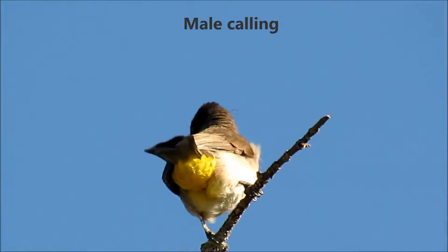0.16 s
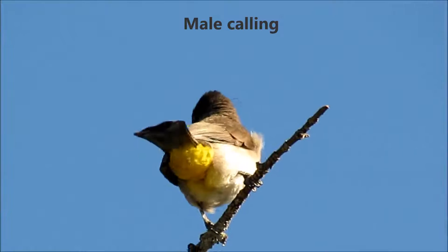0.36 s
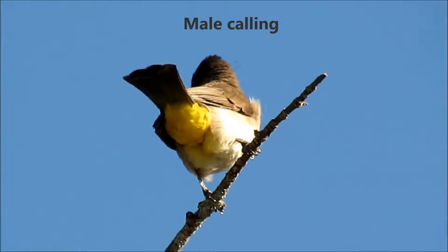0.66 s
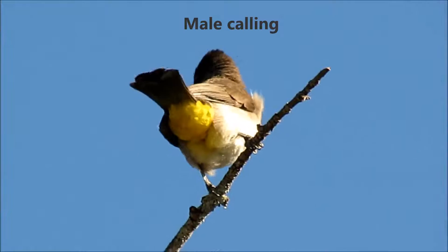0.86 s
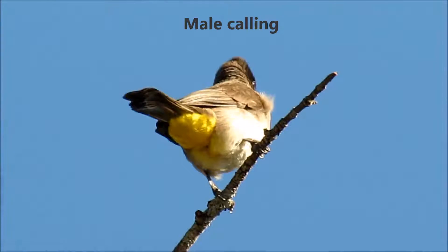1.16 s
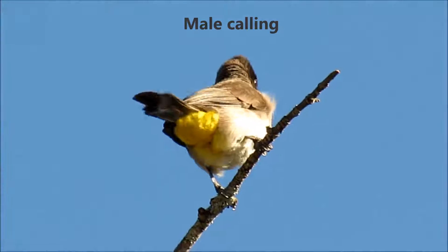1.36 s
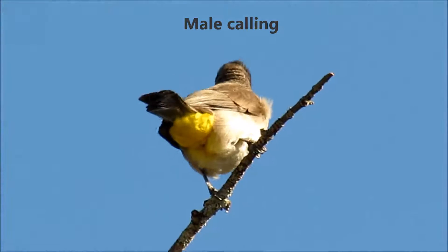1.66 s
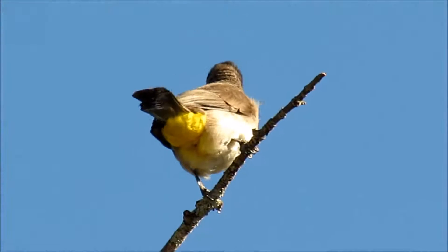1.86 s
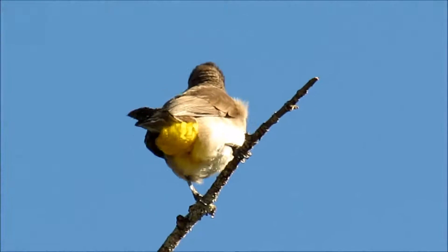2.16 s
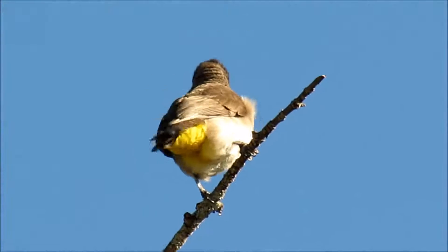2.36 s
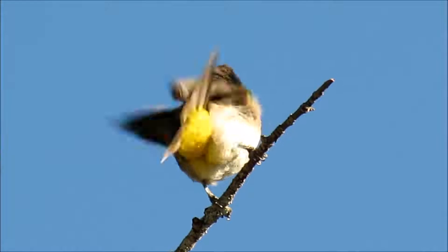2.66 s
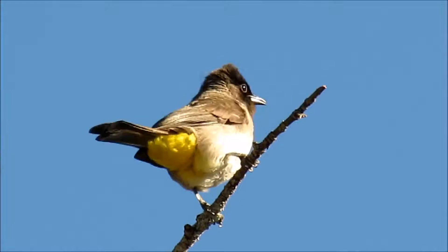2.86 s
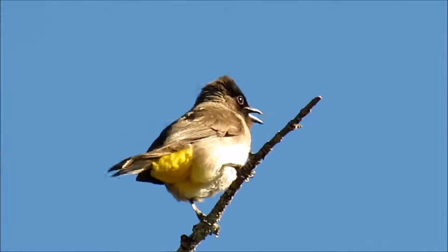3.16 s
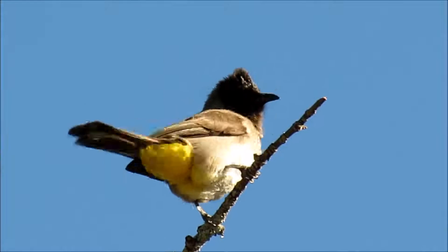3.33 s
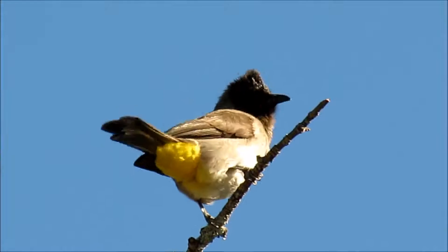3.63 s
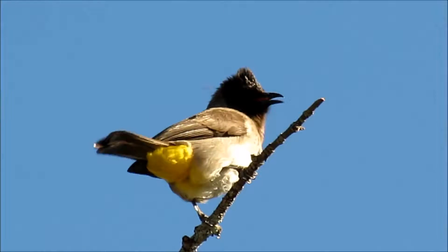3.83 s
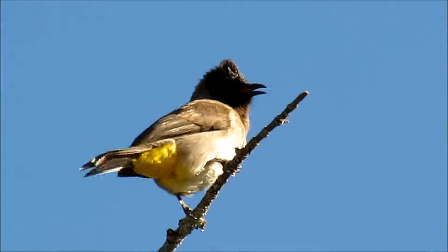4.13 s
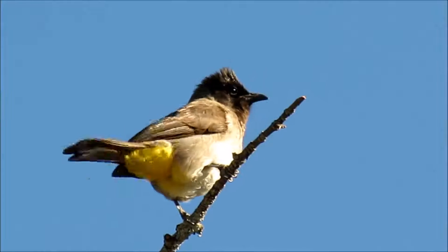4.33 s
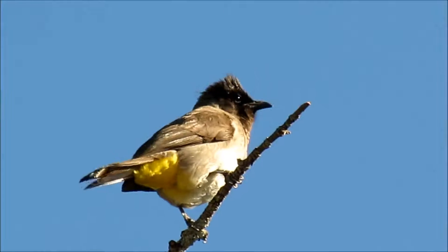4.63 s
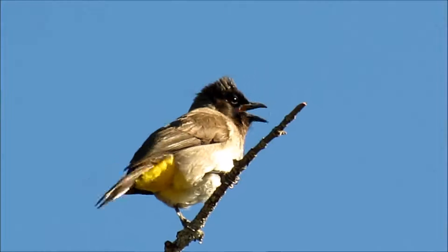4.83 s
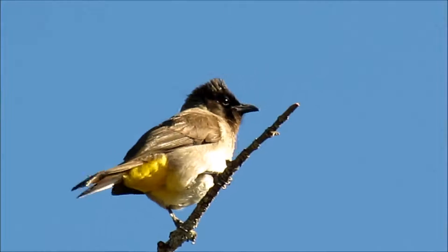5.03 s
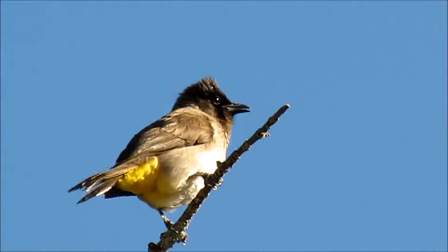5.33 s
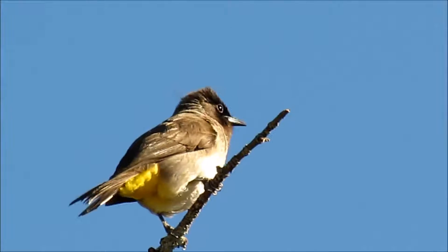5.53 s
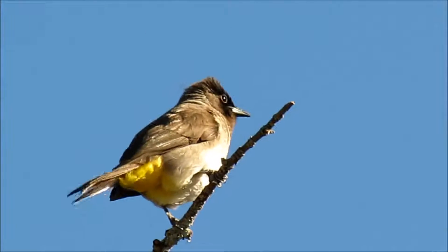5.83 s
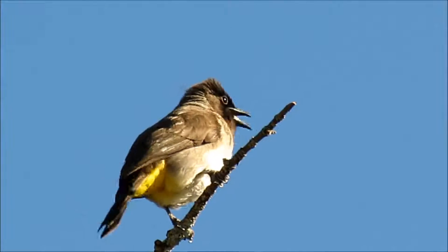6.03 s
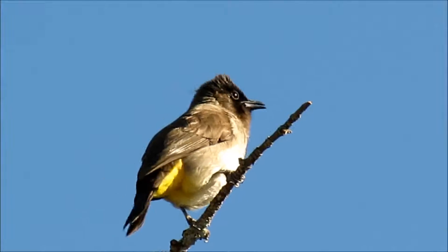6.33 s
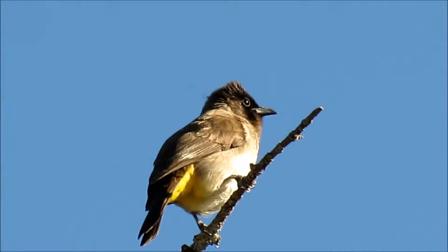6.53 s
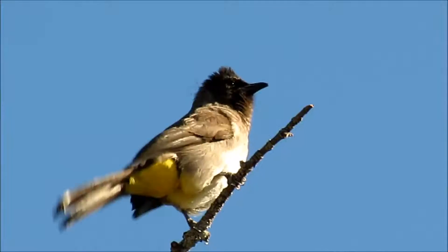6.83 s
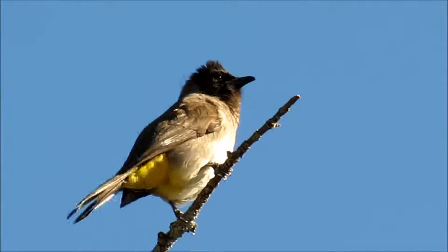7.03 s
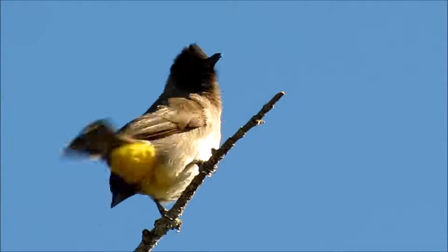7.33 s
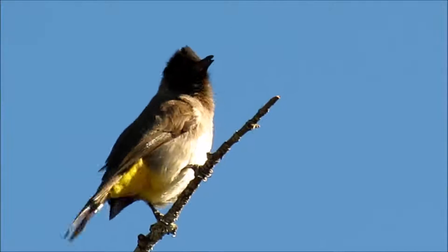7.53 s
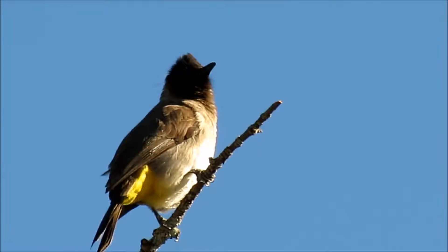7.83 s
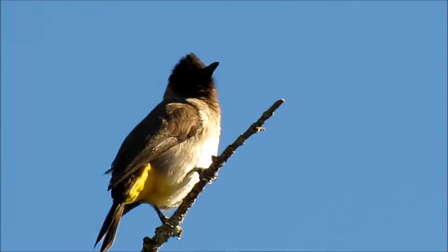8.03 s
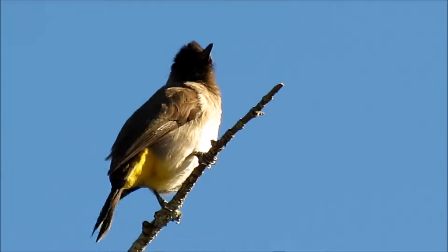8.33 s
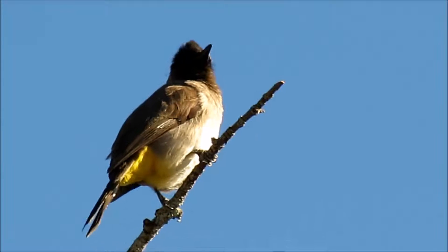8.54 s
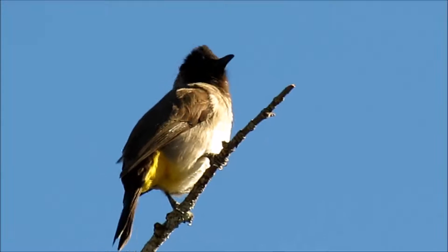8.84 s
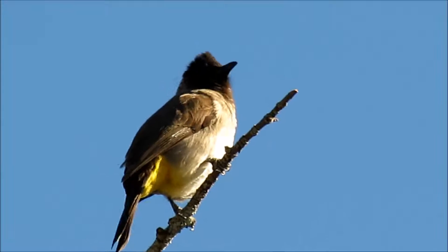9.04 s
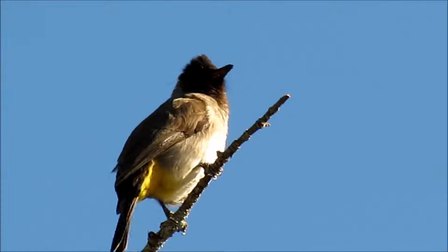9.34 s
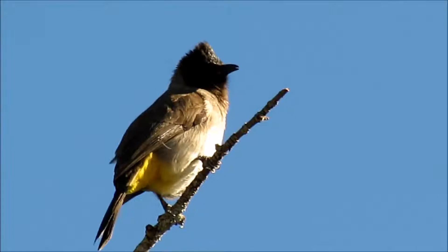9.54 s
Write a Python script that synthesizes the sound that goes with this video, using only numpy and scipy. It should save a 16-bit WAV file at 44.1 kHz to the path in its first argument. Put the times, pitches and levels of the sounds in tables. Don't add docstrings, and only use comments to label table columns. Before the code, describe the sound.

A chirp is already sounding at 0 s, then evenly spaced bright, slightly raspy rising chirps follow until about 1.1 s, with a thin second bird twittering at left near 0.4-0.6. A lower clear pip at 1.4 and rough churr at 1.6 lead to a slur at 2.0, a chirp at 2.4, then pip and churr at 2.7-2.9. From 3.2 to 6.1 s chirps repeat about every 0.3 s; the left bird adds a high wavering warble around 4.9-5.3. Softer slurs come at 6.3 and 6.7, a chirp at 7.0, pip, churr and a dropping, level whistle at 7.3-7.75. Sparse slurred notes follow at 8.2, 8.7 and 9.2, then a last chirp at 9.5 amid left twitters. Faint far peeps, short outdoor reverberation, quiet traffic wash and hiss continue; soft handling knocks occur between 1 and 1.9 s.

```python
import sys
import numpy as np
from scipy import signal
from scipy.io import wavfile
from scipy.ndimage import uniform_filter1d

SR = 44100
rng = np.random.default_rng(int(sys.argv[2]) if len(sys.argv) > 2 else 0)


def digitize_waveform(pressure):
    field = np.atleast_2d(pressure).T
    bounded = np.clip(field, -1, 1)
    quanta = np.round(bounded * 32767).astype(np.int16)
    wavfile.write(sys.argv[1], SR, quanta)


def attenuation_scalar(level_db):
    decades = np.asarray(level_db, float) / 20
    return 10 ** decades


N = 427329
LEAD = SR // 10
EDGE_HZ = 15400
RAGGED, RAGGED_SPAN = .55, 40
RASP_DB = -22

# frequency_hz, density_db (per Hz)
WASH_SPECTRUM = [(12, -32), (20, 2), (212, -4), (448, -8), (530, -9.5), (592, -9.5), (1000, -12),
                 (1400, -15.5), (1700, -13.5), (2010, -14), (3500, -16), (3800, -15.5), (15200, -33)]
# frequency_hz, correlation (-1 to 1)
WASH_LIKENESS = [(60, -0.72), (180, -0.37), (540, -0.12), (1630, 0.054), (4920, 0.11), (14800, -0.42)]
# start_s, level_db, pitch_hz, t60_s
KNOCKS = [
    (1.028, -30.5, 122.5, 0.022),
    (1.048, -38.5, 626, 0.053),
    (1.588, -43.5, 616, 0.096),
    (1.882, -35.5, 537, 0.034),
]
# delay_s, left_db, right_db
REFLECTIONS = [
    (.0035, -11, -14),
    (.0085, -5, -5),
    (.021, -17, -15),
]
# frequency_hz, t60_s
REVERB_TIME = [(1000, 0.66), (1900, 0.42), (2600, 0.4), (3200, 0.48), (4500, 0.27), (7000, 0.55),
               (12000, 0.091)]
# frequency_hz, gain_db
REVERB_COLOUR = [(1000, -2.5), (2500, 6), (4000, 4), (6500, -3), (10000, -37)]
# frequency_hz, gain_db
BEAK_GAIN = [(3000, -35), (3700, -13.5), (5000, -20.5), (6400, -26.5), (8000, -29.5), (9600, -29),
             (10500, -47), (11500, -50), (13000, -44.5), (15000, -51.5)]
# start_s, length_s, from_hz, to_hz, level_db
FAR_PEEPS = [(2.96, .03, 4230, 3850, -60), (3.07, .08, 4900, 4380, -58), (6.58, .12, 5700, 5240, -64),
             (6.50, .03, 2920, 3750, -51), (6.50, .04, 2100, 3000, -50), (6.62, .07, 4400, 4350, -63),
             (3.09, .04, 2900, 2500, -56), (1.97, .06, 6400, 5230, -63), (1.33, .06, 4770, 4530, -62),
             (.73, .05, 5800, 6160, -59), (8.045, .03, 1720, 1740, -56), (8.04, .09, 3750, 3750, -64),
             (8.655, .025, 1700, 1650, -56), (8.985, .02, 1700, 1730, -57)]
# start_s, length_s, from_hz, to_hz, level_db
TWITTER_GLIDES = [(.390, 0.016, 4850, 5700, -45), (.392, 0.011, 6030, 7100, -49),
                  (.405, 0.04, 3800, 4230, -43.5), (.455, 0.036, 4260, 6030, -39.5),
                  (.545, 0.058, 3800, 5360, -40), (4.862, .036, 3900, 5500, -42),
                  (4.918, .045, 4050, 5500, -37), (9.420, .070, 3360, 3600, -47),
                  (4.962, .058, 6150, 6130, -50.5), (9.285, 0.025, 4510, 5540, -41.5),
                  (9.325, .060, 4000, 5480, -35), (9.365, 0.024, 6300, 3300, -43),
                  (9.395, 0.051, 6250, 6600, -52), (9.458, 0.01, 4380, 6340, -41),
                  (9.464, 0.03, 6440, 7330, -49), (9.543, 0.04, 4530, 5360, -38.5),
                  (9.620, 0.025, 5000, 5950, -39)]
# time_s, pitch_hz, level_db
LONG_WARBLE = [
    (5.053, 3770, -47),
    (5.072, 4800, -38.5),
    (5.092, 6860, -63),
    (5.120, 7310, -63),
    (5.135, 5600, -53),
    (5.165, 4530, -37.5),
    (5.210, 4990, -43.5),
    (5.278, 5230, -39.5),
    (5.297, 6940, -53),
]
# time_s, treble_db
BEAK_FACING = [(0.0, -4), (.5, -11.5), (1.1, -10), (1.5, -12), (2.7, -10.5), (3.3, -1.5), (4.0, 6),
               (5.8, 5.5), (6.4, -4), (7.0, 3.5), (7.6, 1), (8.2, -0.5), (8.7, -9.5), (9.5, 6)]

# time_s (in the note), pitch (share of top), level_db, half_pitch_db
CHIRP_SHAPE = [
    [(.009, .57, -24, -18), (.016, .82, -11, -23), (.025, .93, -10, -26)],
    [(.022, .64, -15, -20), (.031, .90, -4, -25)],
    [(.030, .62, -17, -20), (.038, .83, -6, -22), (.045, 1.0, 0, -30), (.077, .91, -4, -40)],
]
SLUR_SHAPE = [
    [(.013, .80, -21, -40), (.030, 1.12, -18, -40)],
    [(.017, .64, -14, -28), (.028, .76, -2, -21), (.046, .865, 0, -19), (.068, 1.01, -2, -19),
     (.075, .86, -2, -21), (.084, .66, -3, -21)],
]
PIP_SHAPE = [
    [(.009, .64, -18, -40), (.020, 1.0, 0, -40), (.031, .96, 0, -40), (.044, .90, -7, -40),
     (.060, .93, -16, -40)],
]
CHURR_SHAPE = [
    [(.011, .68, -18, -30), (.026, .70, -9, -30)],
    [(.028, .84, 3, -34), (.038, .93, -3, -28), (.058, 1.0, -9, -22)],
    [(.061, .96, 3, -28), (.067, .92, -8, -26), (.072, .86, 1, -26), (.084, .74, -6, -26)],
]
FALL_SHAPE = [
    [(.0, 1.0, -16, -40), (.012, .91, 0, -40), (.052, .645, -5, -40), (.100, .64, -6, -40),
     (.154, .645, -5, -40)],
]
HELD_SHAPE = [
    [(.008, .90, -24, -40), (.018, 1.10, -17, -40), (.036, 1.14, -19, -40)],
    [(.018, .70, -14, -34), (.040, .87, -2, -22), (.070, .90, 0, -20), (.078, 1.0, 0, -20),
     (.094, .80, -2, -20)],
]

# start_s, level_db, top_pitch_hz, straight_path_db, and for slurs and the held note stretch (ratio)
CHIRP_NOTES = [(-.045, -24.5, 3294, 9), (0.232, -21.5, 3372, 1.5), (.500, -21, 3275, 1),
               (0.794, -21.5, 3265, 1), (1.062, -21, 3150, 1.5), (2.381, -21, 3173, 0),
               (3.198, -25.5, 3132, 0.5), (3.584, -22.5, 3360, 1.5), (3.924, -24, 3347, 1.5),
               (4.216, -22.5, 3260, 1.5), (4.496, -23, 3096, -0.5), (4.881, -23, 3322, 0.5),
               (5.144, -26.5, 3077, 2), (5.436, -25, 3137, 1), (5.732, -23, 3317, 2), (6.056, -24, 3294, 2),
               (6.985, -23, 3192, 2.5), (9.478, -24.5, 3258, 3)]
SLUR_NOTES = [
    (2.031, -31, 2964, 2.05, 1),
    (6.326, -32, 3010, 1.3333, 0.95),
    (6.707, -34.5, 2958, 1.3333, 0.98),
    (8.189, -32.5, 2916, 2.5, .97),
    (9.181, -32.5, 3103, 2.6, 1.26),
]
PIP_NOTES = [
    (1.394, -27.5, 2420, 0.5),
    (2.708, -23, 2406, -0.8),
    (7.312, -29, 2510, 3),
]
CHURR_NOTES = [
    (1.590, -29, 2895, 4.5),
    (2.806, -27.5, 2948, 1.45),
    (7.461, -27.5, 2878, 1.6),
]
HELD_NOTES = [(8.727, -30, 2928, 1.8, 1.01)]
FALL_NOTES = [(7.603, -27, 2873, 0.28)]


def read(points, hz):
    f, value = np.transpose(points)
    return np.interp(np.log(hz + 1), np.log(f + 1), value)


def add(mix, s, sound):
    part = mix[..., LEAD + round(s * SR):][..., :sound.shape[-1]]
    part += sound[..., :part.shape[-1]]


def wobble(size, span):
    x = rng.standard_normal(size)
    x = uniform_filter1d(uniform_filter1d(x, span), span)
    return x / np.std(x)


def stereo(left_db, right_db):
    return attenuation_scalar(np.array([[left_db], [right_db]]))


def wash():
    frames, hz = N // 256 + 5, np.fft.rfftfreq(1024, 1 / SR)
    a, b, c, d, patches = rng.standard_normal((frames, 513, 5)).T
    patches = uniform_filter1d(uniform_filter1d(patches, 14, 0), 20, 1)
    same = np.clip(read(WASH_LIKENESS, hz), -1, 1)[:, None]
    left = a + 1j * b
    right = same * left + np.sqrt(1 - same ** 2) * (c + 1j * d)
    level_db = read(WASH_SPECTRUM, hz)[:, None] + patches / patches.std() + 0.6 * wobble(frames, 60)
    spectra = np.array([left, right]) * attenuation_scalar(level_db)
    x = signal.istft(spectra, nperseg=1024, noverlap=768)[1][:, :N]
    wash_db = -51
    return attenuation_scalar(wash_db) * x / x.mean(0).std() * stereo(.4, -.4)


def handling():
    out, t = np.zeros(N + LEAD), np.arange(4000) / SR
    for s, db, hz, t60 in KNOCKS:
        onset = np.clip(t / 0.0017, 0, 1)
        add(out, s, attenuation_scalar(db - 60 * t / t60) * np.sin(2 * np.pi * hz * t) * onset)
    return out


def yard(x):
    wet_db, build_s, clump_db = -5.5, .03, 6.5
    out, t = np.zeros((2, len(x))), np.arange(len(x)) / SR
    for k in range(3):
        taps = np.zeros((2, SR))
        at = np.arange(0, SR - 20, 20) + rng.integers(0, 20, (2, (SR - 1) // 20))
        strength = attenuation_scalar(clump_db * rng.standard_normal(at.shape))
        np.put_along_axis(taps, at, rng.choice([-1., 1.], at.shape) * strength, 1)
        taps[1] = 0.22 * taps[0] + taps[1]
        hz, age, z = signal.stft(taps, SR, nperseg=128)
        fall_db = -60 * age / read(REVERB_TIME, hz)[:, None] + read(REVERB_COLOUR, hz)[:, None]
        build = np.clip(age / build_s, 0, 1)
        tail = signal.istft(z * attenuation_scalar(fall_db) * build, SR, nperseg=128)[1]
        tail = tail / np.linalg.norm(tail[0])
        share = np.sqrt(2 / 3) * np.cos(2 * np.pi * (0.5374 * t + k / 3) / 2)
        out += signal.fftconvolve((x * share)[None], tail, axes=1)[:, :len(x)]
    return attenuation_scalar(wet_db) * out


def nearby(x):
    out = np.array([x, x])
    for s, left_db, right_db in REFLECTIONS:
        add(out, s - LEAD / SR, x * stereo(left_db, right_db))
    return out


def stroke(s, hz, db, half_db=None, facing_db=-12, unsteady=0.012, rasp_db=RASP_DB):
    t = np.arange(s[0], s[-1], 1 / SR)
    pitch = uniform_filter1d(np.interp(t, s, hz), size=90, mode="nearest")
    wavering = pitch * (1 + unsteady * wobble(len(t), 40))
    phase = 2 * np.pi * (np.cumsum(wavering) / SR + rng.random())
    effort_db = np.interp(t, s, db) + 3.05 * wobble(len(t), 70)
    tone = np.sin(phase)
    if half_db is not None:
        uneven = attenuation_scalar(np.interp(t, s, half_db))
        half_lines = np.sin(phase / 2) + .8 * attenuation_scalar(facing_db / 2) * np.sin(3 * phase / 2)
        tone += uneven * (1 + .35 * wobble(len(t), 2 * RAGGED_SPAN)) * half_lines
        rasp_db = rasp_db + 18 * uneven
    tone *= 1 + attenuation_scalar(rasp_db) * wobble(len(t), 10)
    low_buzz_db = 65
    for k in range(2, 8):
        gain_db = read(BEAK_GAIN, k * pitch) + facing_db * k * pitch / 9000 + 0.39 * (effort_db - max(db))
        lowness = np.clip(1 - pitch / 3200, 0, .2)
        gain_db += low_buzz_db * lowness * np.clip((k * pitch - 9700) / 1400, -.4, 1)
        ragged = 1 + RAGGED * wobble(len(t), RAGGED_SPAN)
        tone += attenuation_scalar(gain_db) * np.sin(k * phase) * ragged * (k * pitch < EDGE_HZ)
    edge = np.clip(np.minimum(t - s[0], s[-1] - t) / .002, 0, 1)
    return tone * attenuation_scalar(effort_db) * edge


def glides(table):
    ease, peak, fade_db = 1.3, .3, 32
    u = np.linspace(0, 1, 9)
    tracks = []
    for s, length, hz, to_hz, db in table:
        pitch = hz + (to_hz - hz) * (1 - (1 - u) ** ease)
        level_db = db - fade_db * (u - peak) ** 2
        tracks.append(np.transpose([s + u * length, pitch, level_db]))
    return tracks


def other_birds(tracks):
    out = np.zeros(N + LEAD)
    for track in tracks:
        add(out, track[0][0], stroke(*np.transpose(track), unsteady=.013, rasp_db=-14))
    return out


def singer():
    sung, straight = np.zeros((2, N + LEAD))
    kinds = [(CHIRP_SHAPE, CHIRP_NOTES), (SLUR_SHAPE, SLUR_NOTES), (PIP_SHAPE, PIP_NOTES),
             (CHURR_SHAPE, CHURR_NOTES), (HELD_SHAPE, HELD_NOTES), (FALL_SHAPE, FALL_NOTES)]
    for shape, notes in kinds:
        for s, db, top_hz, straight_db, *slower in notes:
            stretch = slower[0] if slower else .97
            facing_db = np.interp(s, *np.transpose(BEAK_FACING))
            for part in shape:
                t, share, level_db, half_db = np.transpose(part)
                unsteady, rasp_db = (.0095, RASP_DB) if max(half_db) > -39 else (.004, RASP_DB - 6)
                sound = stroke(t * stretch, share * top_hz, level_db + db, half_db, facing_db,
                               unsteady, rasp_db)
                start = s + t[0] * stretch
                add(sung, start, sound)
                add(straight, start, sound * attenuation_scalar(np.clip(straight_db, -3, 5)))
    throat = signal.butter(2, 1100, "high", fs=SR, output="sos")
    return signal.sosfilt(throat, [sung, straight])


def scene():
    far = other_birds(glides(FAR_PEEPS))
    other = other_birds(glides(TWITTER_GLIDES) + [LONG_WARBLE])
    sung, straight = singer()
    ground_echo = attenuation_scalar(-1.5) * np.roll(other, round(.0095 * SR))
    birds = nearby(straight) * stereo(-.6, .6)
    birds += (other + ground_echo) * stereo(4.5, -5.5)
    birds += .9 * far
    birds += yard(sung + attenuation_scalar(4.5) * other + attenuation_scalar(8.0) * far)
    return (birds + handling())[:, LEAD:] + wash()


def top_cut(x):
    return signal.sosfilt(signal.butter(12, 15390, fs=SR, output="sos"), x)


def record(dry):
    low_pass = signal.firwin(511, EDGE_HZ, window=("kaiser", 9), fs=SR)
    mix = signal.oaconvolve(dry, low_pass[None], "same")
    return top_cut(mix)


dry = scene()
out = record(dry)
digitize_waveform(out)
```